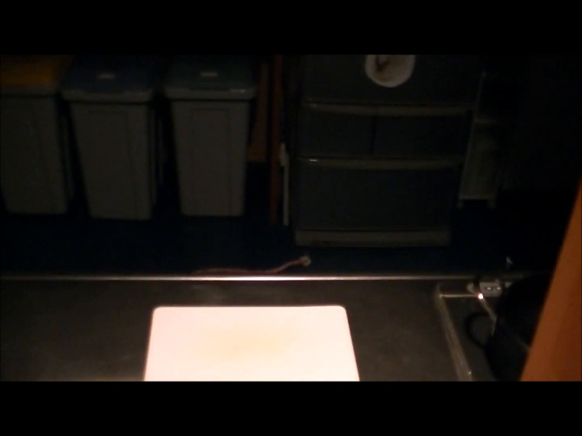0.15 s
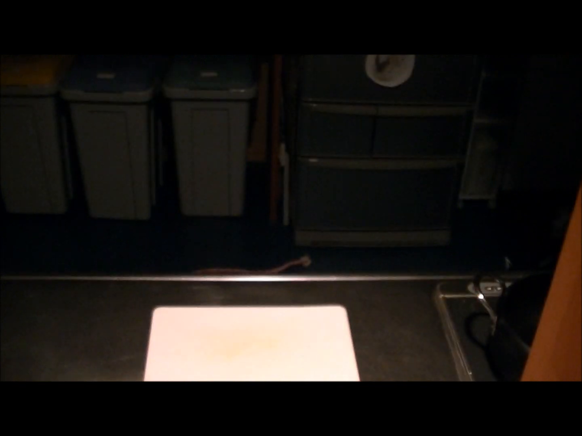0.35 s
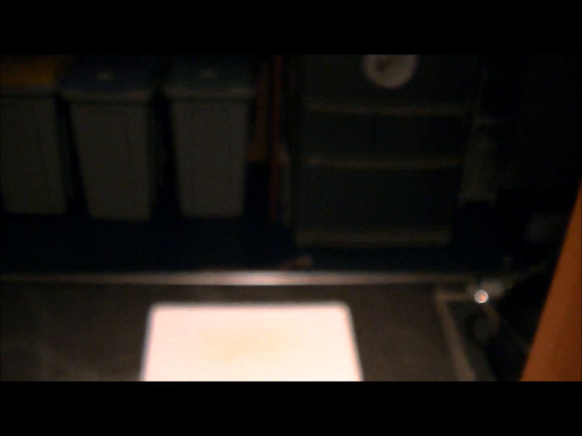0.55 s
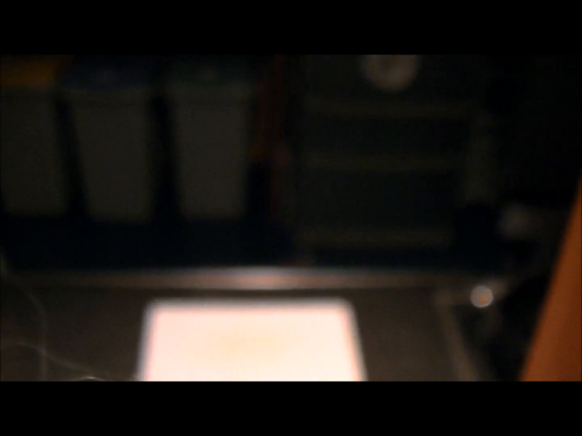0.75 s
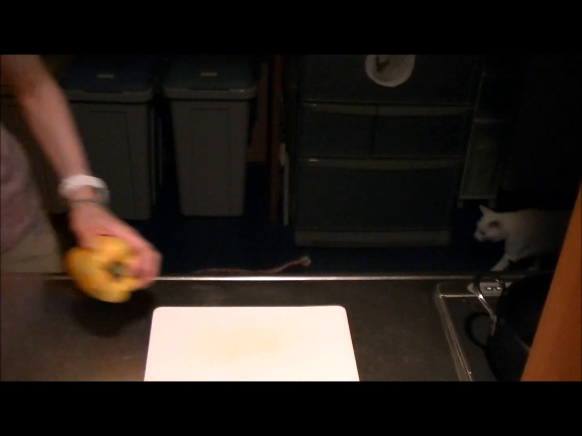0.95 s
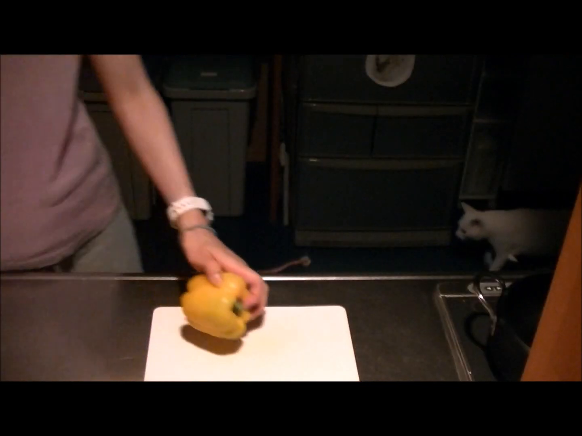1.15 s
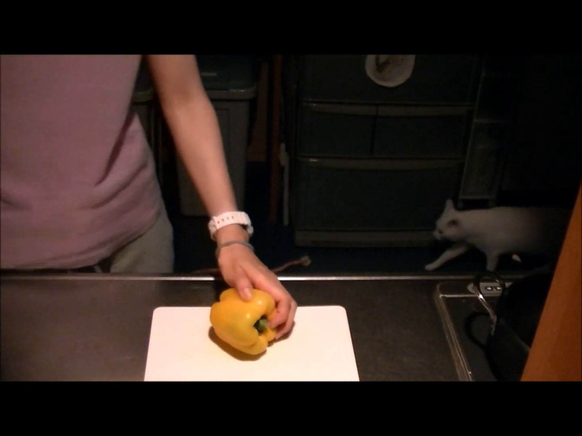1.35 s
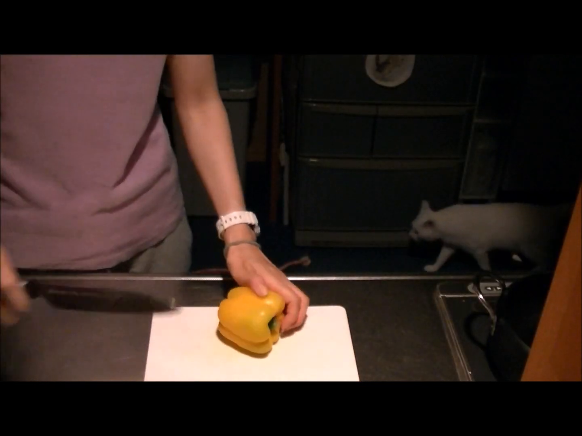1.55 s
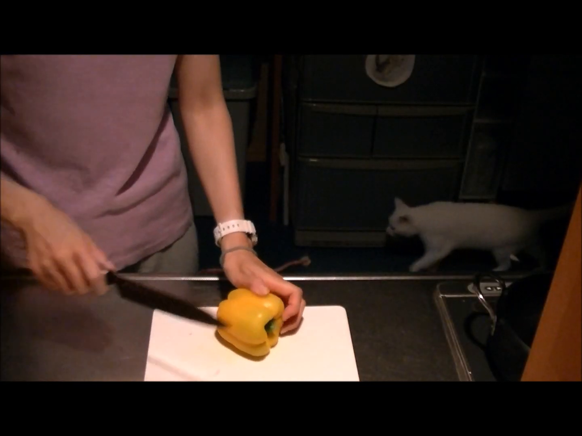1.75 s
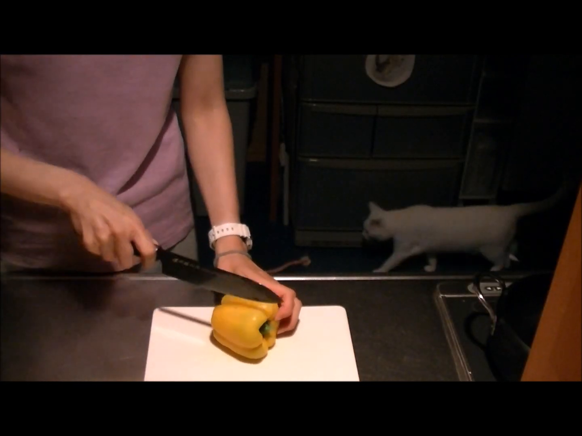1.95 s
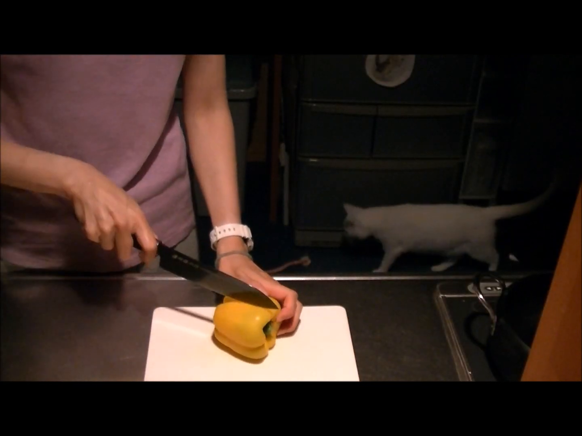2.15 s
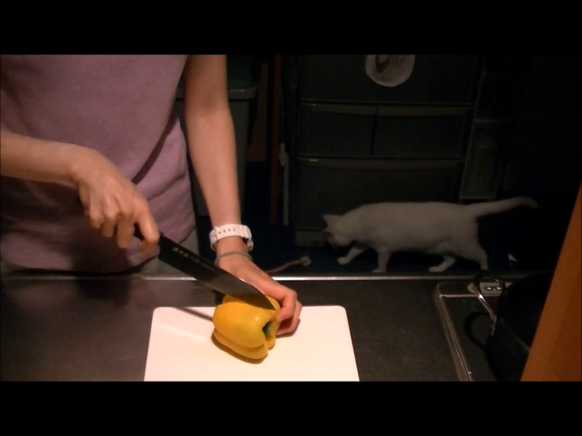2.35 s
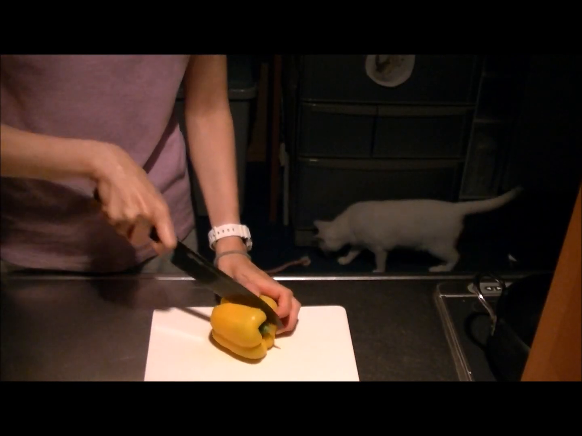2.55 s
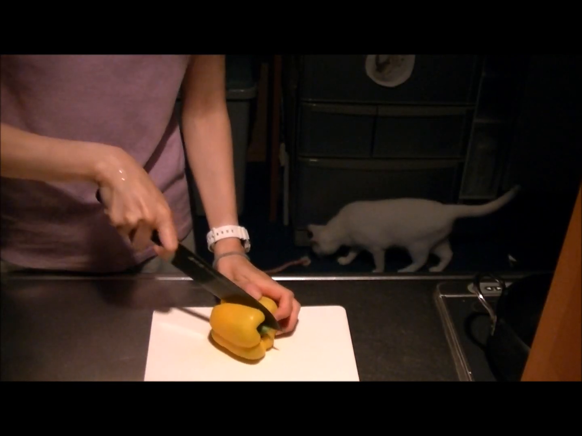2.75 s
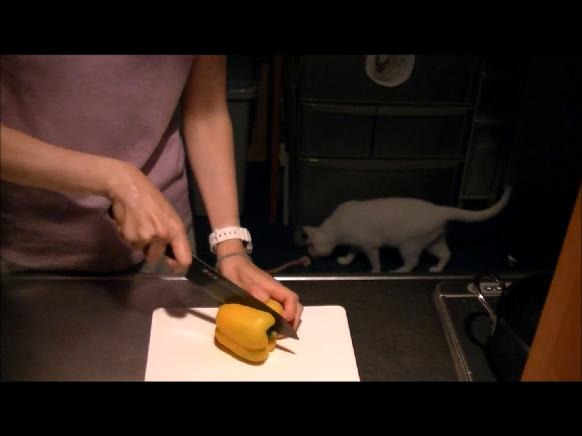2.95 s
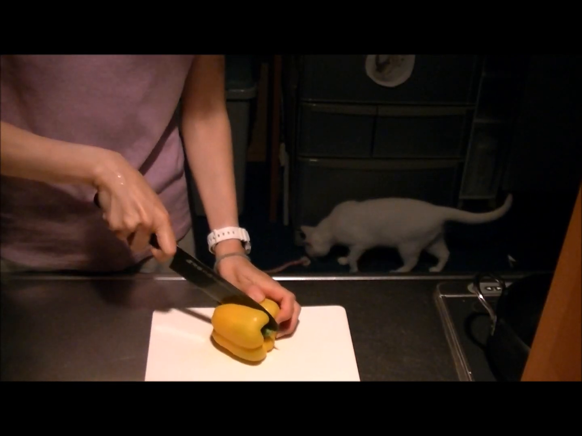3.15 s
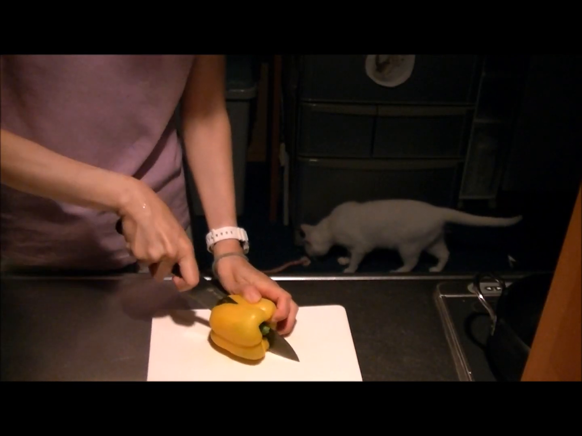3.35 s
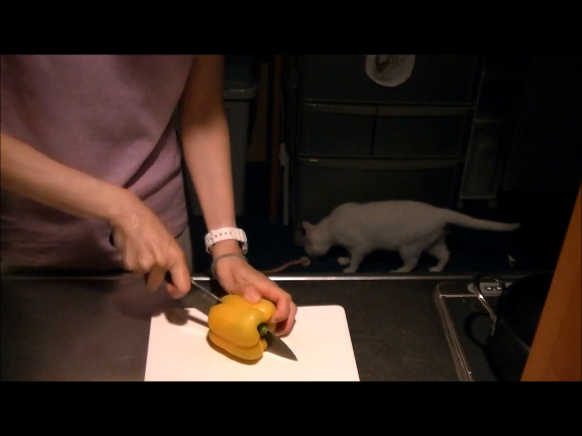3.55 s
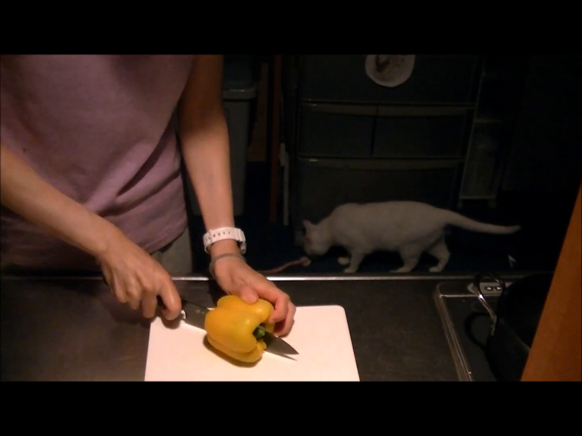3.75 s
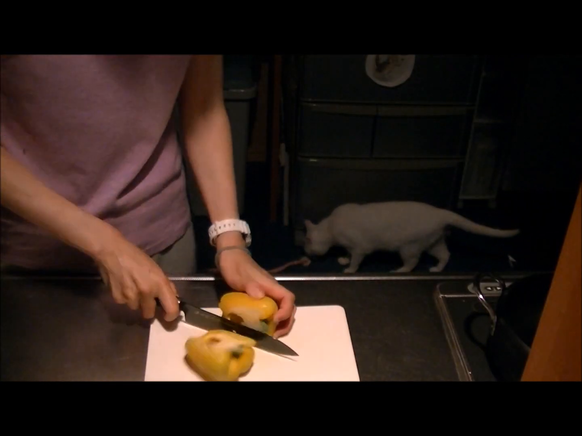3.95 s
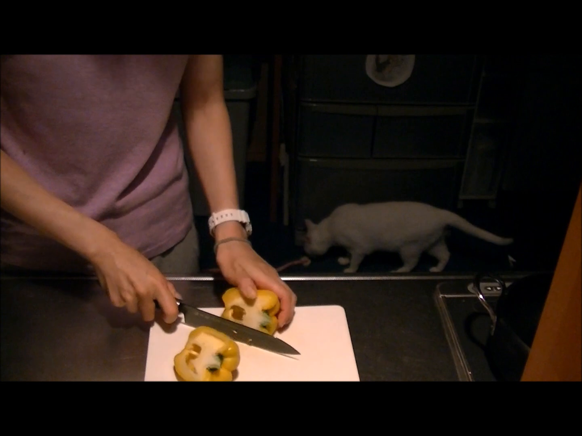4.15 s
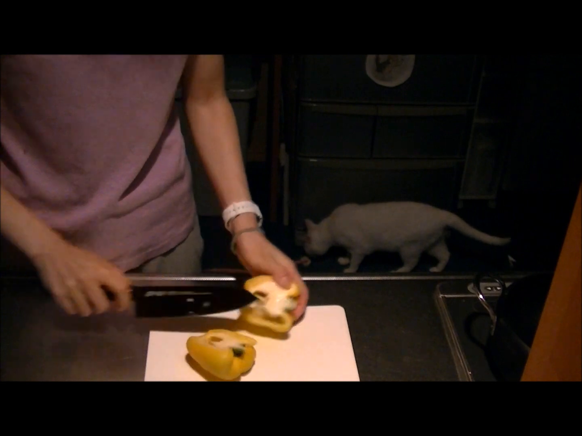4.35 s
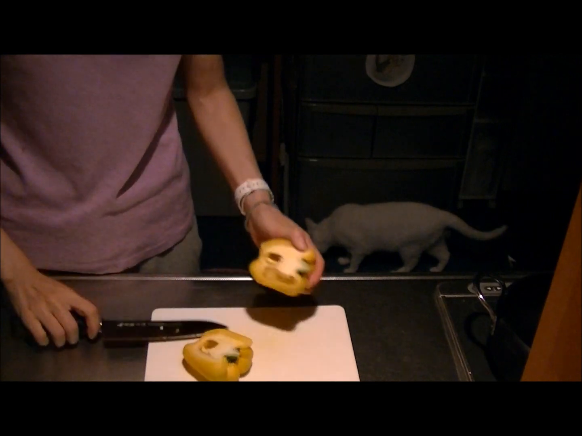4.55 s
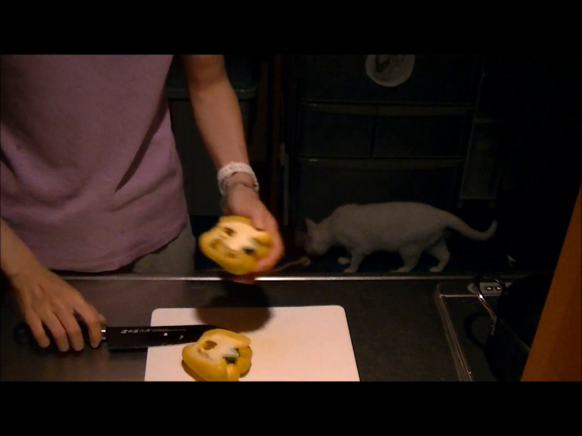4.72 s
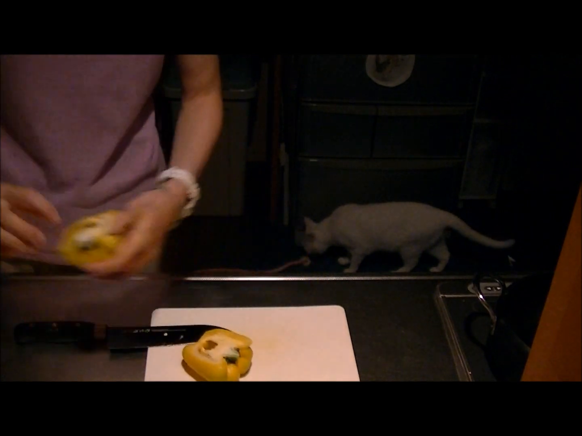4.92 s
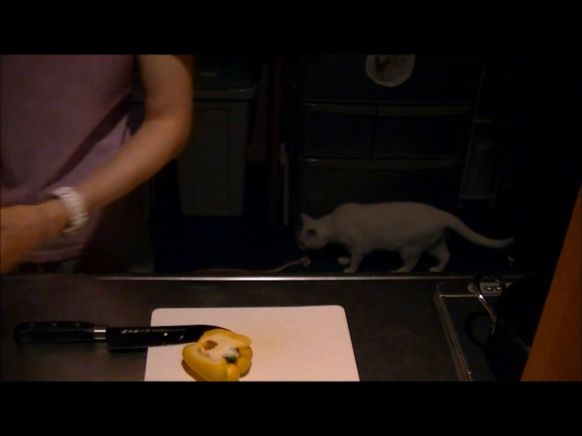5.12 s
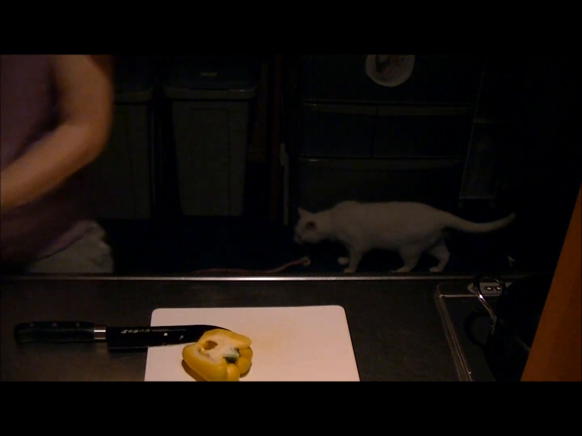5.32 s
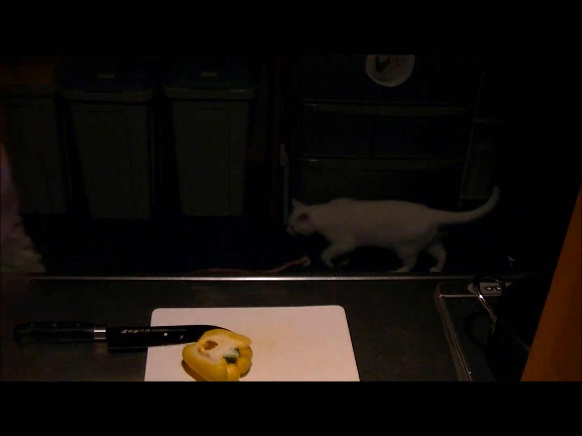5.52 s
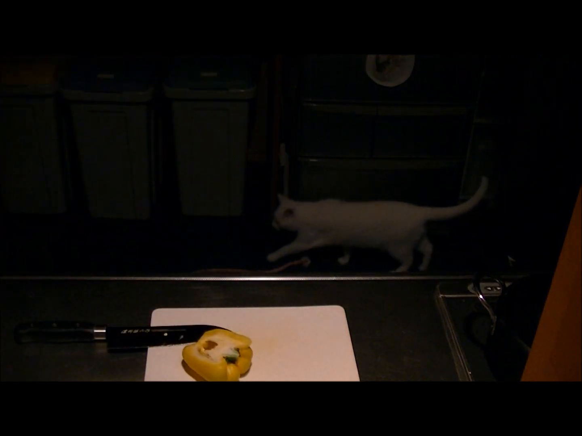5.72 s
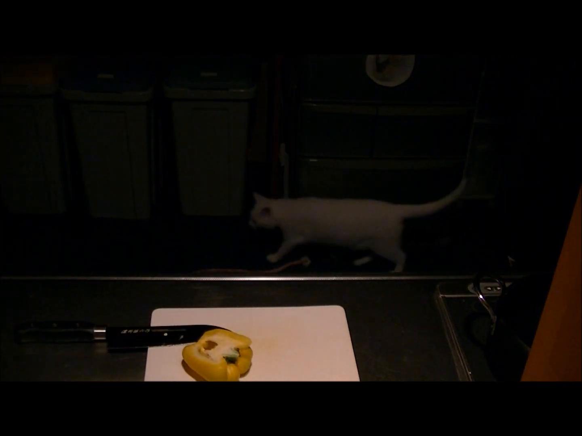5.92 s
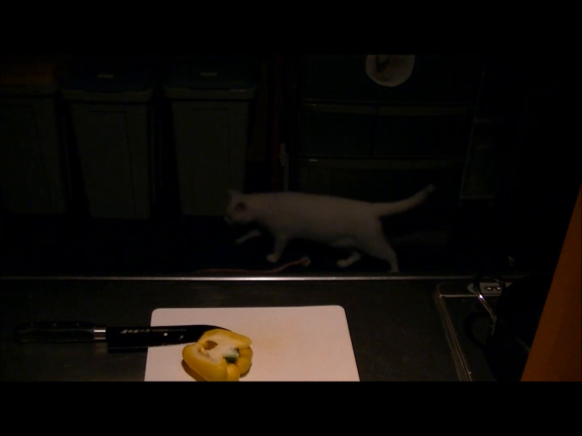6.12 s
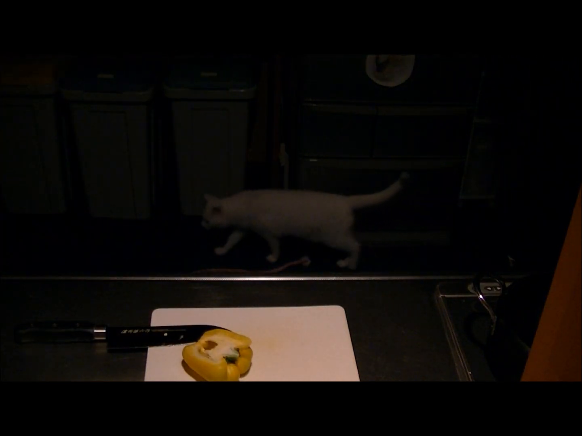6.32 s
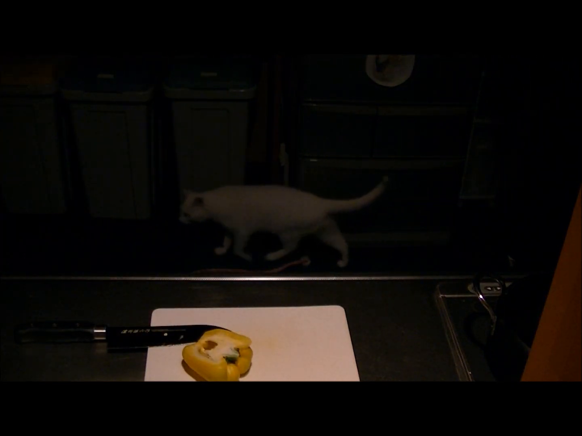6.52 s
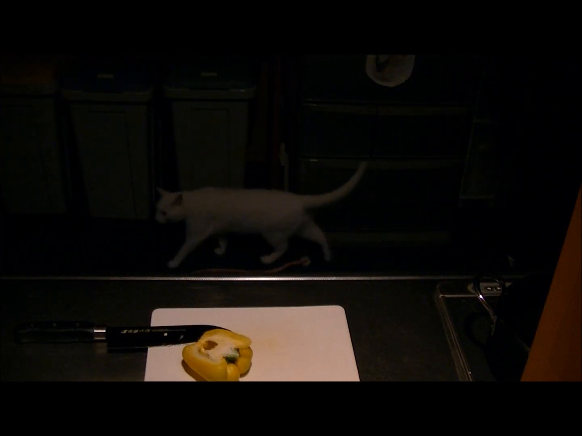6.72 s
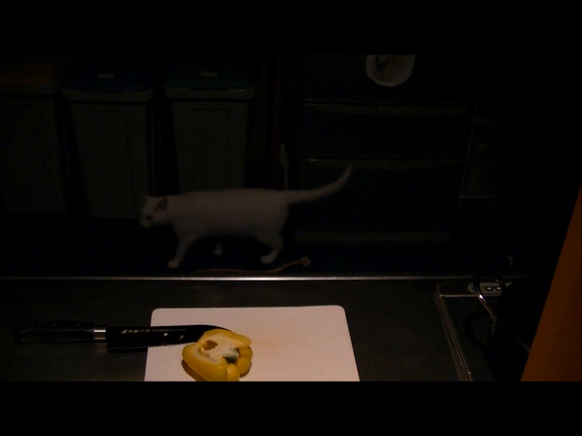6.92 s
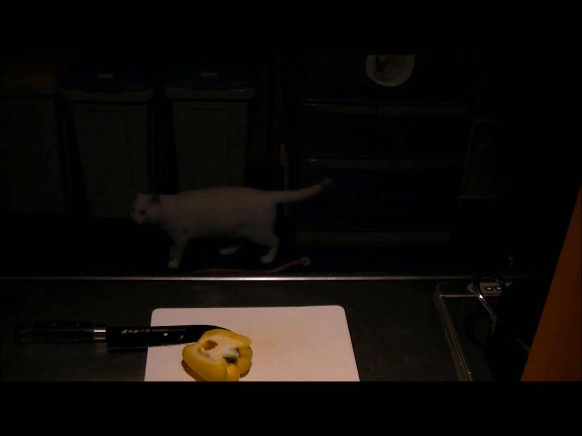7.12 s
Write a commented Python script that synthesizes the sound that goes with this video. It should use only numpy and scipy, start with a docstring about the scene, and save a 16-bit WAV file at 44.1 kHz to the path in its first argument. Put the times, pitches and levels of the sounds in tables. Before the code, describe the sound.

In a quiet kitchen with a fridge humming, a pepper lands, is sliced with one hard knock, the knife clacks down, and small wet squeaks end it.

```python
"""A thin scrape and a broad brush of noise pass by over a refrigerator's hum and fan noise in a small, live kitchen.
A bell pepper lands on a plastic board on a steel counter: blows and rubbing set its hollow body ringing.
Bursts of tiny slips saw through flesh and skin, and one hard knock of the knife splits the pepper on the board.
The blade is drawn out in a sinking band of hiss, a cut half rocks with soft thuds and the knife is laid down.
Last, the other half is handled: rubbing rustles and fizzes, stick-slip squeaks, and torn cells tick."""
import sys
import numpy as np
from scipy import signal
from scipy.fft import rfft, irfft
from scipy.io import wavfile

SR = 44100
rng = np.random.default_rng(int(sys.argv[2]) if len(sys.argv) > 2 else 0)


def bounce(signal):
    """Save signal as a 16-bit WAV file at the path given by the first command-line argument."""
    frames = np.transpose(np.atleast_2d(signal))
    limited = np.clip(frames, -1, 1)
    pcm = np.round(limited * 32767).astype(np.int16)
    wavfile.write(sys.argv[1], SR, pcm)


N = 321048
TIME = np.arange(N) / SR   # seconds

# Event levels are those of the dry layer, ahead of any layer trim and the room.
# Colours are relative, as every response is scaled to peak 1.

# Steady fan noise, colour: pitch_hz [Hz], level_db [dB per Hz]
FAN_COLOUR = [(25, -34.5), (60, -7.5), (90, -14), (150, -6), (250, 1.5), (400, -2.5), (600, -4), (1300, -7),
              (2200, -13.5), (3200, -18.5), (4500, -24), (7000, -30), (10000, -35.5), (14000, -44)]
FAN_MID_DB, FAN_SIDE_DB = -60.0, -52.0   # rms, the side ahead of the width stage
# Refrigerator tones: pitch_hz [Hz], level_db [dB rms, about which each wavers]
HUM_TONES = [(118.4, -74.5), (236.9, -72), (360.7, -72), (409.1, -77.5), (479.1, -65), (522.2, -76.5),
             (694.4, -77.5), (845.2, -81.5), (942.1, -77.5), (1179, -76)]
# The kitchen's diffuse echoes: pitch_hz [Hz], t60_s [s], level_db [dB per Hz, relative]
ROOM_DECAY = [(71.5, 0.049, 1.5), (193, 0.66, -0.5), (610, 0.41, 0.5), (1500, 0.51, 2), (3970, 0.56, 2),
              (12200, 0.29, -4.5)]
# Its nearest surfaces: delay_s [s], level_db [dB against the direct sound]
NEAR_SURFACES = [(.0026, -6.5), (.0063, -7.5)]
# Colour of the difference between the microphone ports: pitch_hz [Hz], level_db [dB]
SIDE_COLOUR = [(60, -22.5), (500, -25), (1500, -23), (4000, -18), (7000, -20.5), (10000, -43)]
# Left port's level over the right's: pitch_hz [Hz], level_db [dB]
PORT_BALANCE = [(100, -.8), (400, -1.1), (2000, -.8), (4000, -.2), (10000, .1)]
CUTOFF_HZ = 14800   # top of the microphone's range

# Someone moves up to the counter, thin scrapes: start_s [s], rise_s [s], fall_s [s], level_db [dB]
THIN_SCRAPES = [(0, 0.001, 0.068, -43.5), (.41, 0.041, 0.043, -57)]
# Broad brushes, same move: start_s [s], rise_s [s], fall_s [s], level_db [dB]
BROAD_BRUSHES = [(0, 0.0023, 0.041, -53), (.35, 0.047, 0.17, -47.5)]
# Colours of the scrape and of the brush: pitch_hz [Hz], level_db [dB]
SCRAPE_COLOUR = [(50, -36), (200, -1.5), (650, 1.5), (1500, -3.5), (2300, -6), (3300, 2), (4200, -6.5),
                 (5500, -10), (8000, -29), (14000, -36)]
BRUSH_COLOUR = [(60, -30), (200, -19), (390, 2.5), (600, -5), (1000, -7), (2200, -5), (3200, -9.5),
                (4500, -14.5), (7000, -17.5), (10000, -22.5), (14000, -43)]

# Soft bumps that shake the counter: start_s [s], boom_db [dB peak], pock_db [dB peak]
SOFT_THUDS = [(.797, -72, -45), (0.818, -52.5, -70), (1.046, -45.5, -55), (1.323, -51, -61),
              (1.414, -51.5, -67), (2.073, -58, -80), (2.893, -50, -40), (3.28, -38.5, -63.5),
              (3.346, -49, -58), (3.993, -41.5, -33.5), (4.023, -54, -58), (4.259, -44, -37.5),
              (4.429, -44.5, -43), (4.565, -47, -70.5)]
# Colours of the counter's boom and the hollow pock: pitch_hz [Hz], level_db [dB]
COUNTER_COLOUR = [(25, -37), (50, -5), (75, 1.5), (110, -0.5), (160, -3), (260, -9.5), (600, -47.5),
                  (3000, -74)]
POCK_COLOUR = [(60, -10), (300, -9.5), (600, -14.5), (930, -7), (1400, -13), (2500, -31), (8000, -59)]
# Low resonances of the counter top: pitch_hz [Hz], width_hz [Hz], lift_db [dB]
COUNTER_RESONANCES = [(76, 16, 6), (153, 30, -10.5)]

# The pepper lands and settles: start_s [s], level_db [dB peak]
LANDING_BUMPS = [(1.0700, -18.5), (1.076, -28.5), (1.110, -28), (1.143, -39), (1.157, -30.5), (1.283, -30)]
# Rocking and rubbing under hand or knife: start_s [s], rise_s [s], fall_s [s], level_db [dB]
BOARD_ROCKS = [(1.047, .004, .008, -44), (1.071, 0.0082, 0.044, -38), (1.156, 0.019, 0.06, -34.5),
               (1.262, 0.024, 0.029, -37), (3.216, 0.11, .04, -44)]
# Colours of the pepper's bump and of its hollow rubbing: pitch_hz [Hz], level_db [dB]
PEPPER_COLOUR = [(40, -37), (90, -11), (150, 4.5), (250, -10.5), (390, -2), (600, -4.5), (1000, -3),
                 (1500, -13.5), (2200, -10), (3200, -22), (4500, -27), (7000, -43), (10000, -50),
                 (14000, -70)]
HOLLOW_COLOUR = [(50, -17), (100, -12), (150, -4), (380, 0.5), (600, -3.5), (1250, -8), (2200, -11),
                 (5000, -29), (12000, -52)]
# Resonances of the hollow pepper: pitch_hz [Hz], width_hz [Hz], lift_db [dB]
HOLLOW_RESONANCES = [(131, 17, 9.5), (230, 67, 10.5), (373, 32, 10), (750, 82, 3), (1230, 190, 7)]

# Fingers rub the cut half: start_s [s], rise_s [s], fall_s [s], rustle_db [dB], fizz_db [dB]
FINGER_RUBS = [(5.04, 0.033, 0.027, -55.5, -80), (5.24, 0.036, .04, -56.5, -82),
               (5.635, .02, 0.037, -50, -71.5), (5.70, .03, 0.055, -54.5, -73),
               (6.63, .05, 0.031, -50.5, -61), (6.765, .025, .045, -56, -64)]
# Colours of the wet rustle and of the juice's treble fizz: pitch_hz [Hz], level_db [dB]
RUSTLE_COLOUR = [(200, -25), (800, 5), (1300, 14.5), (1900, 8.5), (2600, 1.5), (3400, -0.5), (5000, -10.5),
                 (7000, -16), (9000, -30), (11000, -34), (14000, -33)]
JUICE_COLOUR = [(1500, -40), (5500, 0), (7800, 0), (9300, -4), (11000, -22), (14000, -26)]
# Slips on wet skin: start_s [s], length_s [s], level_db [dB rms], pitch_hz [Hz], jitter [share of pitch]
SKIN_SQUEAKS = [(5.062, 0.032, -61, 1970, .25), (5.278, 0.042, -56.5, 1087, 0.16),
                (5.708, 0.04, -55.5, 1640, .2), (6.252, 0.027, -43.5, 1810, 0.21),
                (6.258, 0.021, -39.5, 1008, .22), (6.285, 0.021, -42, 1088, 0.12),
                (6.636, 0.02, -55, 1707, 0.046), (6.639, 0.034, -60.5, 3625, .06),
                (6.655, 0.059, -51.5, 1346, 0.048), (6.777, 0.028, -57, 1330, .07)]
# Colour of wet skin: pitch_hz [Hz], level_db [dB]
WET_SKIN_COLOUR = [(60, -32), (600, -3), (1100, -1), (2000, -3), (3400, -16), (5000, -36), (9000, -34),
                   (14000, -51)]
# Crisp ticks of the handled half: start_s [s], level_db [dB peak], pitch_hz [Hz]
CRISP_TICKS = [(5.523, -37.5, 2040), (5.531, -34, 1820), (5.921, -35, 1740), (5.927, -32.5, 1500),
               (6.06, -44, 1720), (6.243, -34, 1620), (6.251, -24, 1860), (6.255, -28.5, 1970),
               (6.782, -30, 2230), (6.899, -40, 2900), (6.985, -30.5, 2210), (7.104, -37.5, 2140),
               (7.114, -36.5, 1570), (7.238, -44, 2620)]
# Colour of a snap: pitch_hz [Hz], level_db [dB]
SNAP_COLOUR = [(60, -37), (600, -10.5), (1200, 1.5), (2300, -6.5), (3200, -10.5), (4500, -18.5),
               (7000, -23.5), (9500, -30.5), (14000, -68)]

# The blade is drawn out: start_s [s], rise_s [s], fall_s [s], level_db [dB]
BLADE_DRAWS = [(3.572, 0.013, 0.14, -47.5)]
DRAW_HZ, DRAW_SAG_HZ_PER_S, DRAW_END_HZ = 4600, 8700, 3430
# Sawing strokes: start_s [s], rise_s [s], fall_s [s], flesh_db [dB], skin_db [dB]
SAW_STROKES = [(2.475, .095, 0.065, -49.5, -57.5), (2.85, 0.015, .1, -50, -63),
               (3.215, 0.091, 0.057, -40.5, -51), (3.524, 0.089, 0.11, -38.5, -52)]
# The skin splits: start_s [s], level_db [dB peak]
SKIN_SPLITS = [(3.2890, -31), (3.2947, -33), (3.3213, -31), (3.6012, -56)]
# Colours of flesh and of bursting skin: pitch_hz [Hz], level_db [dB]
FLESH_COLOUR = [(40, -16), (150, -8), (420, 8), (900, -0.5), (1500, 0), (2500, -5.5), (5000, -46),
                (12000, -68)]
SKIN_COLOUR = [(300, -39), (1500, -16), (3000, 8), (4500, 6.5), (6000, 2.5), (9000, -7.5), (12000, -18),
               (15000, -45)]
GRIP_S = 0.016   # fade in ahead of every push and fade out after it

# The blade breaks through onto the board: start_s [s], level_db [dB peak]
CHOP_HITS = [(3.253, -36), (3.2785, -28.5), (3.3213, -9), (3.344, -28)]
# The light blade meets the board: start_s [s], level_db [dB peak]
BLADE_HITS = [(4.5900, -23.5), (4.6385, -25)]
# The knife's heavy end, heel or handle, meets the board: start_s [s], level_db [dB peak]
HEAVY_END_HITS = [(3.6008, -32.5), (3.661, -32.5), (4.6395, -15.5), (4.6437, -27), (4.667, -26)]
# Colours of chop, blade and heavy-end contacts: pitch_hz [Hz], level_db [dB]
CHOP_COLOUR = [(40, -10.5), (110, -8), (200, 5), (450, 6), (800, -2.5), (1300, 6.5), (1900, 1.5),
               (2300, -9.5), (2800, -22.5), (4200, -27.5), (6500, -34), (10000, -58), (14000, -57)]
BLADE_COLOUR = [(60, -17), (150, -13), (500, -6), (850, -3.5), (1200, -10), (1900, 4.5), (2450, 2.5),
                (3400, -14), (4400, -16), (7000, -36), (13000, -72)]
HEAVY_END_COLOUR = [(60, -57), (150, -14), (300, -8.5), (520, -2), (850, -1), (1200, -3), (1900, -11.5),
                    (2700, -20), (4500, -34.5), (7000, -42), (10000, -42), (14000, -56)]
# Resonances of the board on the counter: pitch_hz [Hz], width_hz [Hz], lift_db [dB]
BOARD_RESONANCES = [(129.2, 14, 11.5), (197.8, 6.5, 13.5), (380, 33, 1), (572, 95, 8.5), (859, 65, 10.5),
                    (1150, 16, 4), (1410, 220, 1), (1416, 26, 4), (1735, 24, 9), (1760, 40, -4)]


def from_db(db):
    """Decibels to gain."""
    return 10 ** (np.asarray(db) / 20)


def rms_one(x):
    """Scale to rms 1."""
    return x / np.sqrt(np.mean(x ** 2) + 1e-20)


def at_hz(points, hz):
    """Read a table on a log-frequency axis."""
    table_hz, value = np.transpose(points)
    return np.interp(np.log(np.maximum(hz, 1)), np.log(table_hz), value)


def drift(rate, count=N):
    """Random wander through rate knots a second, each of spread 1."""
    knots = rng.standard_normal(count // 40 + 2)
    return np.interp(np.arange(count) * rate / SR, np.arange(len(knots)), knots)


def pulse(colour, modes=(), size=8192):
    """The causal (minimum-phase) response of a body with this colour and these resonances; peak 1."""
    hz = np.arange(size // 2 + 1) * SR / size
    level_db = at_hz(colour, hz)
    for mode_hz, width_hz, lift_db in modes:
        level_db = level_db + lift_db / (1 + (2 * (hz - mode_hz) / width_hz) ** 2)
    # keeping only the causal half of the cepstrum puts the energy first
    cepstrum = irfft(np.log(from_db(level_db)))
    cepstrum[size // 2:] = 0
    cepstrum[0] *= .5
    wave = irfft(np.exp(2 * rfft(cepstrum)))[:size // 2]
    return wave / np.abs(wave).max()


def through(x, response):
    """Pass a sound through a response."""
    return signal.oaconvolve(x, response)[:N]


def add(out, start_s, sound):
    """Mix a sound in at a time."""
    start = max(round(start_s * SR), 0)
    out[start:start + len(sound)] += sound[:N - start]


def blows(rows, response):
    """Each blow sets the same body ringing."""
    out = np.zeros(N)
    for start_s, level_db in rows:
        add(out, start_s, from_db(level_db) * response)
    return out


def friction(response, per_s, spread_db):
    """Dense tiny slips of uneven size and random sign drive a body; rms 1."""
    sizes = from_db(spread_db * np.minimum(rng.exponential(1, N), 4))
    signs = rng.choice([-1, 1], N)
    slipping = rng.random(N) < per_s / SR
    return rms_one(through(sizes * signs * slipping, response))


def swells(rows, depth_db):
    """Each push sets in depth_db under its peak, swells to it, eases off as far and lets go; a gain curve."""
    gain = 0
    for start_s, rise_s, fall_s, level_db in rows:
        t = TIME - start_s
        from_peak = np.maximum((rise_s - t) / rise_s, (t - rise_s) / fall_s)
        touching = np.clip(1 + np.minimum(t, rise_s + fall_s - t) / GRIP_S, 0, 1)
        gain = gain + touching * from_db(level_db - depth_db * from_peak)
    return gain


def room_tail(build_s):
    """Diffuse echoes of unit energy: they thicken at first, then each half octave dies at its own rate."""
    t = TIME[:SR // 2]
    tail = 0
    edges_hz = np.geomspace(40, 16000, 18)
    decay = np.array(ROOM_DECAY)
    for low, high in zip(edges_hz, edges_hz[1:]):
        centre_hz = np.sqrt(low * high)
        t60_s = at_hz(decay[:, [0, 1]], centre_hz)
        level_db = at_hz(decay[:, [0, 2]], centre_hz)
        bandpass = signal.butter(2, [low, high], "band", fs=SR, output="sos")
        band = signal.sosfilt(bandpass, rng.standard_normal(len(t)))
        band = band * (1 - np.exp(-t / build_s)) * np.exp(-np.log(1000) * t / t60_s)
        tail = tail + from_db(level_db) * rms_one(band) * np.sqrt(high - low)
    return rms_one(tail) / np.sqrt(len(t))


def kitchen(x, tail_db, build_s):
    """Mid holds direct sound, two near surfaces and a diffuse tail; side holds only a tail of its own."""
    response = from_db(tail_db) * room_tail(build_s)
    response[0] += 1
    for delay_s, level_db in NEAR_SURFACES:
        add(response, delay_s, from_db(level_db) * signal.windows.hann(7) / 3)   # the taps sum to 1
    mid = through(x, response)
    side = through(x, from_db(tail_db) * room_tail(build_s))
    return np.array([mid, side])


def room_tone(waver_db=2.5):
    """Fan noise, which arrives from all sides, and the wavering tones of the refrigerator; mid and side."""
    fan_mid, fan_side = [rms_one(through(rng.standard_normal(N), pulse(FAN_COLOUR))) for _ in range(2)]
    hum = 0
    for pitch_hz, level_db in HUM_TONES:
        phase = 2 * np.pi * np.cumsum(pitch_hz + drift(12)) / SR
        hum = hum + from_db(level_db + waver_db * drift(6)) * np.sqrt(2) * np.sin(phase)
    return np.array([from_db(FAN_MID_DB) * fan_mid + hum, from_db(FAN_SIDE_DB) * fan_side])


def approach():
    """Thin scrapes and broad brushes: slips of differing density excite two colours."""
    thin = swells(THIN_SCRAPES, depth_db=17.0) * friction(pulse(SCRAPE_COLOUR), per_s=4800, spread_db=-0.5)
    broad = swells(BROAD_BRUSHES, depth_db=14.0) * friction(pulse(BRUSH_COLOUR), per_s=11000, spread_db=4.0)
    return from_db(-4.0) * (thin + broad)


def thuds():
    """A soft bump booms in the counter top and pocks in the hollow pepper."""
    start_s, boom_db, pock_db = np.transpose(SOFT_THUDS)
    boom = blows(zip(start_s, boom_db), pulse(COUNTER_COLOUR, COUNTER_RESONANCES))
    pock = blows(zip(start_s, pock_db), pulse(POCK_COLOUR, [(890, 150, 7.8)]))
    return boom + pock


def fingering():
    """Fingers rustle over the wet cut half and press tiny bubbles out of the juice."""
    rub_rows = [(start, rise, fall, rustle_db) for start, rise, fall, rustle_db, _ in FINGER_RUBS]
    wet_rows = [(start, rise, fall, fizz_db) for start, rise, fall, _, fizz_db in FINGER_RUBS]
    rustle = swells(rub_rows, depth_db=8.0) * friction(pulse(RUSTLE_COLOUR), per_s=450, spread_db=6.0)
    fizz = swells(wet_rows, depth_db=12.0) * friction(pulse(JUICE_COLOUR), per_s=300, spread_db=3.5)
    return from_db(-5.5) * (rustle + fizz)


def squeaks(width_hz=260, lift_db=10):
    """Stick and slip: an unsteady train of tiny releases rings near its own rate under a smooth swell."""
    out = np.zeros(N)
    count = SR // 4
    for start_s, length_s, level_db, pitch_hz, jitter in SKIN_SQUEAKS:
        cycles = np.cumsum(pitch_hz * (1 + jitter * drift(700, count))) / SR
        releases = np.diff(np.floor(cycles), prepend=0)   # one at each whole cycle
        slips = releases * from_db(7 * drift(900, count))
        skin = pulse(WET_SKIN_COLOUR, [(pitch_hz, width_hz, lift_db)])
        rub = signal.fftconvolve(slips - slips.mean(), skin)[:round(length_s * SR)]
        add(out, start_s, from_db(level_db + 1.0) * rms_one(rub) * np.sqrt(np.hanning(len(rub))))
    return out


def ticks(width_hz=1050, lift_db=12, crumble_s=0.0019):
    """Small snaps: each is a brief dying burst of tearing cells, with a short resonance of its own."""
    out = np.zeros(N)
    t = TIME[:SR // 100]
    for start_s, level_db, pitch_hz in CRISP_TICKS:
        tearing = rng.standard_normal(len(t)) * np.exp(-t / crumble_s)
        snap = signal.fftconvolve(tearing, pulse(SNAP_COLOUR, [(pitch_hz, width_hz, lift_db)]))
        add(out, start_s, from_db(level_db - 3.0) * snap / np.abs(snap).max())
    return out


def pepper_landing():
    """The pepper bumps onto the board, rocks and rubs under hand or knife; its hollow body booms."""
    rubbing = friction(pulse(HOLLOW_COLOUR, HOLLOW_RESONANCES), per_s=900, spread_db=4.5)
    roll = from_db(-8) * swells(BOARD_ROCKS, depth_db=13.0) * rubbing
    bumps = blows(LANDING_BUMPS, pulse(PEPPER_COLOUR, HOLLOW_RESONANCES))
    return kitchen(bumps + roll, tail_db=-2.5, build_s=0.002)


def blade_draw(width_hz=700):
    """The drawn steel hisses in a narrow band that sinks steadily to a floor as the blade comes free."""
    drawn_s = np.maximum(TIME - BLADE_DRAWS[0][0], 0)
    pitch_hz = np.maximum(DRAW_HZ - DRAW_SAG_HZ_PER_S * drawn_s, DRAW_END_HZ)
    phase = 2 * np.pi * np.cumsum(pitch_hz) / SR
    # two random wanders spread the moving tone into a band
    hiss = drift(width_hz) * np.cos(phase) + drift(width_hz) * np.sin(phase)
    return from_db(-10.5) * swells(BLADE_DRAWS, depth_db=6.5) * hiss


def slicing():
    """The blade rubs through the flesh while cells of the skin burst, mostly at the height of the push."""
    rub_rows = [(start, rise, fall, flesh_db) for start, rise, fall, flesh_db, _ in SAW_STROKES]
    crackle_rows = [(start, rise, fall, skin_db) for start, rise, fall, _, skin_db in SAW_STROKES]
    flesh_slips = friction(pulse(FLESH_COLOUR, BOARD_RESONANCES), per_s=2300, spread_db=7.0)
    skin_bursts = friction(pulse(SKIN_COLOUR), per_s=2600, spread_db=6.0)
    flesh = swells(rub_rows, depth_db=15.5) * flesh_slips
    skin = swells(crackle_rows, depth_db=23.5) * skin_bursts
    return from_db(-4.0) * (flesh + skin)


def skin_splits():
    """Sharp single cracks as the skin gives way."""
    return blows(SKIN_SPLITS, pulse(SKIN_COLOUR))


def knocks():
    """Edge, blade and heavy end strike the same board; the hard chop fills the room most."""
    chop = blows(CHOP_HITS, pulse(CHOP_COLOUR, BOARD_RESONANCES))
    blade = blows(BLADE_HITS, pulse(BLADE_COLOUR, BOARD_RESONANCES))
    heavy_end = blows(HEAVY_END_HITS, pulse(HEAVY_END_COLOUR, BOARD_RESONANCES))
    return (kitchen(chop, tail_db=2.0, build_s=0.0074)
            + kitchen(blade, tail_db=-5.0, build_s=0.002)
            + kitchen(heavy_end, tail_db=-1.0, build_s=0.00084))


def scene():
    """Each group of sounds gets its own share of echo; two close ports hear nearly the same."""
    bumps = kitchen(thuds(), tail_db=-3.5, build_s=0.0027)
    handling = kitchen(approach() + squeaks() + fingering(), tail_db=-1.9, build_s=0.00033)
    snaps = kitchen(ticks(), tail_db=-2.5, build_s=0.0019)
    cutting = kitchen(slicing() + blade_draw() + skin_splits(), tail_db=-3.0, build_s=0.0015)
    mid, side = room_tone() + bumps + handling + snaps + pepper_landing() + cutting + knocks()
    side = through(side, pulse(SIDE_COLOUR)) * from_db(-27)
    balance_db = at_hz(PORT_BALANCE, np.arange(N // 2 + 1) * SR / N)
    port_gains = from_db([[.5], [-.5]] * balance_db)   # half the difference to each port
    return irfft(rfft([mid + side, mid - side]) * port_gains, N)


def record(dry):
    """The microphone thins the deep bass; the top is cut steeply."""
    thinned = signal.sosfilt(signal.butter(2, 45, "high", fs=SR, output="sos"), dry)
    return signal.sosfilt(signal.ellip(10, .1, 80, CUTOFF_HZ, fs=SR, output="sos"), thinned)


dry = scene()
out = record(dry)
bounce(out)
```